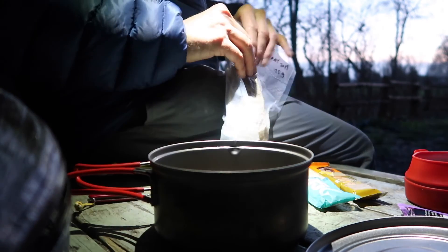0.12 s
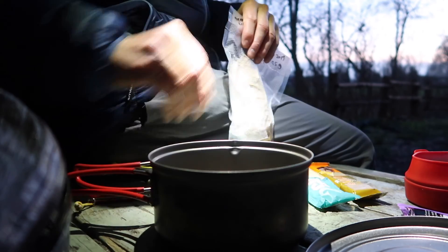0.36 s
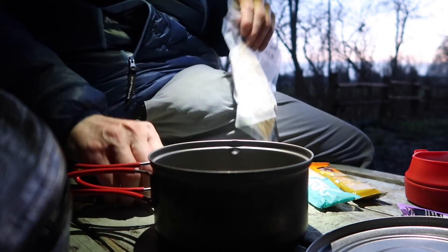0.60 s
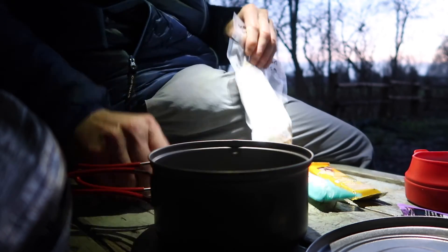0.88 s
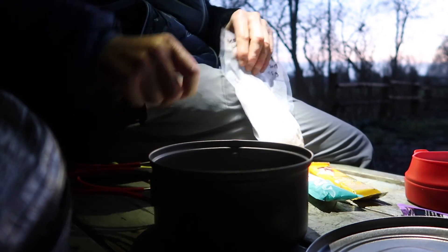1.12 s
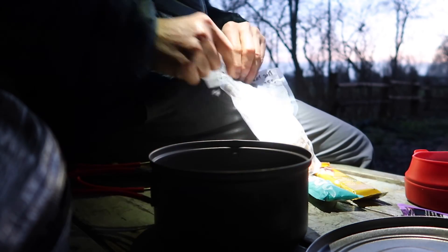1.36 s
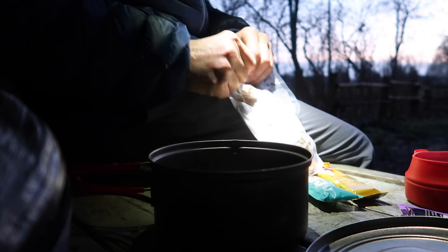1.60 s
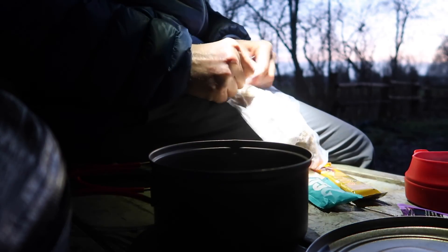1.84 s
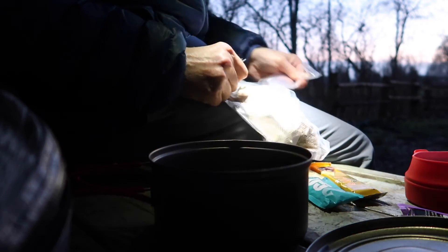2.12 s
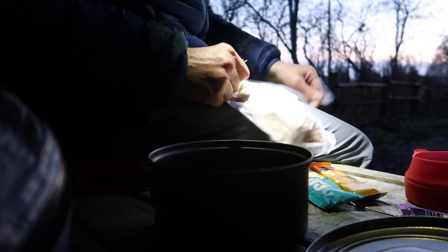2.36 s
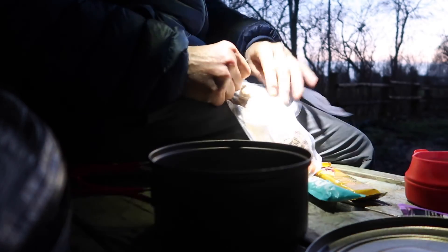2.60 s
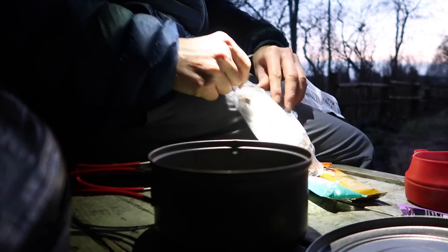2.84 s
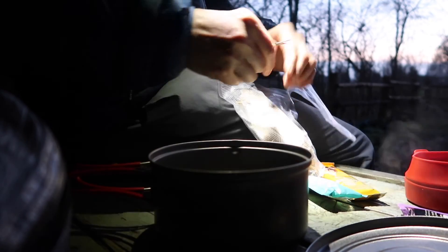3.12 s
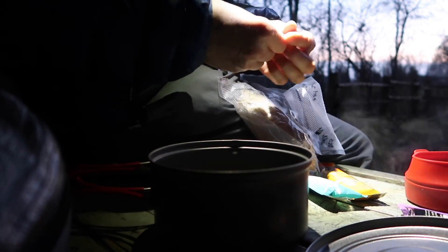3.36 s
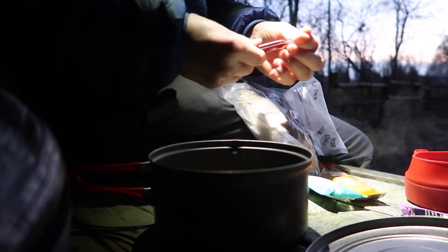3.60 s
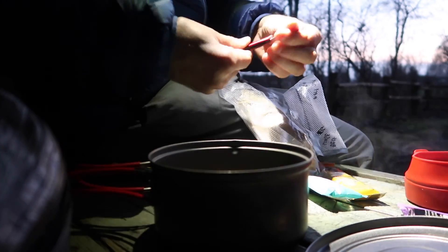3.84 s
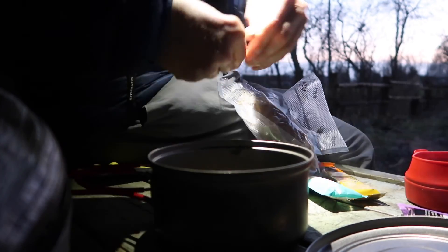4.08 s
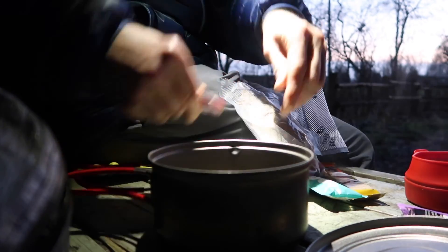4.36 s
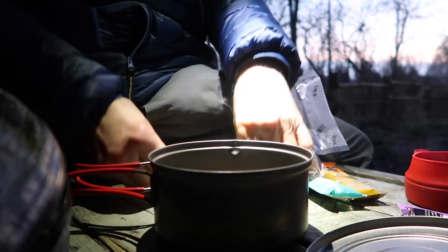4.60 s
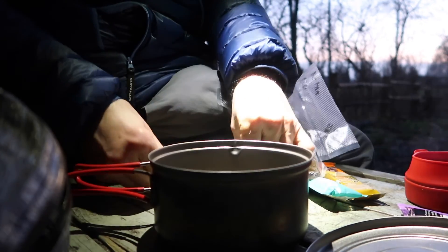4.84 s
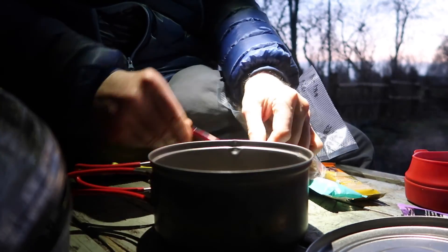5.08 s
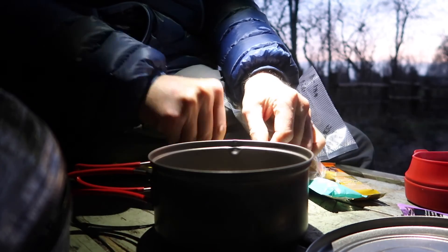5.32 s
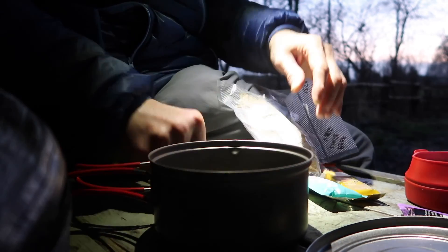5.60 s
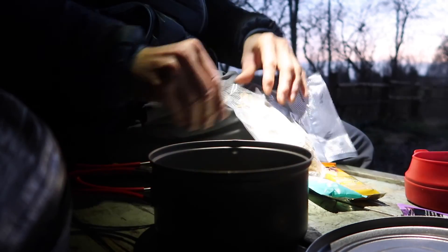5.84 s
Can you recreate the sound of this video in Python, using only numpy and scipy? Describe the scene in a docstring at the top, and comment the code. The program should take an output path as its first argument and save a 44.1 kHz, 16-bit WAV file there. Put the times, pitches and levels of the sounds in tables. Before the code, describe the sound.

Crackly plastic bag handling with bursts of hard pops, a quiet lull, one bright knife click and small table knocks outdoors.

```python
"""Sharp snaps over a dense crinkle: hands work a stiff plastic food bag at an outdoor table, close to a
two-port microphone. Folds are short swelling wavelets with a noise tick; crinkle, sliding film, slumping
contents and sleeves are clumped random grains. A folding knife clicks shut and is laid down, a pot is tapped,
things bump the table: damped modes. Snaps and the shutting knife return once from a hard surface nearby,
a short tail follows the near sounds, and a far road hums throughout as coloured noise."""
import sys
import numpy as np
from scipy import signal
from scipy.fft import rfft, irfft, next_fast_len
from scipy.io import wavfile
from scipy.ndimage import map_coordinates

SR = 44100
rng = np.random.default_rng(int(sys.argv[2]) if len(sys.argv) > 2 else 0)


def gain_from_decibels(decibels):
    """Convert decibel values to linear amplitude factors."""
    exponent = np.asarray(decibels, float) / 20
    return 10 ** exponent


def generate_wav(sig):
    """Save sig (samples, or channels by samples) to the path in sys.argv[1] as 16-bit PCM at SR."""
    pcm = np.round(np.clip(np.atleast_2d(sig).T, -1, 1) * 32767).astype(np.int16)
    wavfile.write(sys.argv[1], SR, pcm)


N = 262761
ECHO_S, ECHO_DB = .0068, -12  # the nearby hard surface: delay, level under the direct sound
FLAT = [(100, 0)]  # f/Hz, level/dB


def unit(x):
    """Scaled to rms 1."""
    return x / np.sqrt(np.mean(x ** 2) + 1e-20)


def along(points, hz):
    """Reads (f/Hz, value) points on a log frequency axis."""
    f, v = np.transpose(points)
    return np.interp(np.log(hz + 1), np.log(f + 1), v)


def curves(rows):
    """A (t/s, level/dB) curve, one value per sample; -120 dB outside it."""
    return np.interp(np.arange(N) / SR, *np.transpose(rows), -120, -120)


def wobble(rate):
    """A smooth random curve, rate knots a second."""
    knots = rng.standard_normal(int(N * rate / SR) + 4)
    return map_coordinates(knots, [np.arange(N) * rate / SR])


def strokes(rows):
    """Gain of overlapping gestures (t/s, peak level/dB, rise/s, fall/s), times per 20 dB; powers add."""
    t = np.arange(0, N + 32, 32) / SR
    s, db, rise_s, fall_s = np.transpose(rows)[:, :, None]
    rising = (s - t) / np.maximum(rise_s, .002)
    falling = (t - s) / np.maximum(fall_s, .002)
    away = np.where(t < s, rising, falling)
    gain = np.linalg.norm(gain_from_decibels(db - 20 * away), axis=0)
    return np.interp(np.arange(N) / SR, t, gain)


def swell(t, peak_s):
    """An envelope that builds to 1 at peak_s and dies away."""
    return (t / peak_s * np.exp(1 - t / peak_s)) ** 3


def ring(t, hz, t60, rise_s):
    """A damped vibration with a soft start."""
    return np.sin(2 * np.pi * hz * t) * gain_from_decibels(-60 * t / t60) * (1 - np.exp(-t / rise_s))


def filtered(x, response):
    """x times a complex response of frequency."""
    m = next_fast_len(N + 8192)
    return irfft(rfft(x, m) * response(np.fft.rfftfreq(m, 1 / SR)), m)[..., :N]


def spread(pair, spectrum, alike):
    """Two unrelated signals coloured, then mixed to left and right as alike as asked; rms 1."""
    def response(hz):
        turn = np.arccos(np.clip(along(alike, hz), -1, 1)) / 2
        return gain_from_decibels(along(spectrum, hz)) * [np.cos(turn), np.sin(turn)]
    mid, side = filtered(pair, response)
    return unit(np.array([mid + side, mid - side]))


# Phase by which the left port leads, at a share of 1: f/Hz, lead/rad
PORT_LEAD = [(100, -0.25), (500, -.1), (2000, 0.18), (3500, -0.44), (5000, -1.5), (9000, -3), (12000, -1.8),
             (16000, -4)]


def ports(x, share):
    """Sound from one side reaches the two ports out of step; a negative share is the other side."""
    sides = np.array([[1], [-1]])
    return filtered(x, lambda hz: np.exp(.5j * share * along(PORT_LEAD, hz) * sides))


def crackle(per_s, spread_db, clump_db, life_s):
    """Two trains of tiny random bursts that come in clumps."""
    sizes = gain_from_decibels(spread_db * np.minimum(rng.exponential(size=(2, N)), 3.5) + clump_db * wobble(60))
    sparks = sizes * (rng.random((2, N)) < per_s / SR)
    glow = signal.lfilter([1], [1, -np.exp(-1 / (life_s * SR))], sparks)
    return unit(glow * rng.standard_normal((2, N)))


def grains(per_s, pitch_hz, octaves, cycles, spread_db):
    """Small folds letting go at random: each a short wavelet at its own pitch; two unrelated sets."""
    draw = rng.random((int(per_s * N / SR), 4))
    pitches = pitch_hz * 2 ** (octaves * rng.standard_normal(len(draw)))
    hz = np.clip(pitches, 700, 9000)[:, None]
    k = np.arange(1, 160)
    size = gain_from_decibels(-spread_db * np.log(draw[:, 1:2] + 0.056))
    wave = size * swell(k / SR, cycles / hz) * np.sin(2 * np.pi * (hz * k / SR + draw[:, 2:3]))
    where = (2 * N * draw[:, :1]).astype(int) + k
    both = np.bincount(where.ravel(), wave.ravel(), 2 * N + len(k) + 1)[:2 * N]
    return unit(both.reshape(2, N))


# Folds that buckle, and the knife's contacts as it is laid down:
# t/s, nominal level/dB, ring f/Hz, edge tick level/dB over it (before EDGE), flutter level/dB over it
SNAPS = [(.009, -10, 3070, 1, -31), (.014, -10.5, 2350, -10, -24.5), (0.028, -14.5, 2540, -7, -25),
         (.064, -26, 2800, -6, -20), (0.112, -23, 2400, -12, -21), (.113, -24, 3520, -8, -19),
         (.121, -32, 2800, -11.5, -16), (.258, -14, 2820, 3, -33), (0.264, -16, 2720, 0, -22),
         (.285, -17, 2840, 16, -20), (.29, -20, 2200, 6, -9), (0.3, -24, 4540, 0, -20),
         (.456, -14, 2410, -6.5, -13.5), (.457, -13.5, 3780, 2, -27.5), (0.502, -29, 2940, -5, -31),
         (.531, -24, 1430, -22.5, -34), (.532, -27, 2600, -18, -33), (.972, -35, 2880, -11, -25),
         (1.004, -23, 2600, -10, -23), (1.013, -16, 2820, -5, -29), (1.029, -19.5, 1500, -15.5, -19),
         (1.051, -19.5, 2400, -8, -11), (1.057, -28.5, 4240, 19, -10), (1.1, -37.5, 4500, -24, -25),
         (1.1772, -19.5, 2100, -10, -22), (1.1773, -28, 3870, -8, -24), (1.1994, -19, 1630, -13, -26),
         (1.1998, -26, 3080, -10, -26), (1.2037, -23, 1900, -10, -25), (1.2036, -30, 4200, -8, -22),
         (1.221, -34, 2000, -10, -16.5), (1.2612, -22, 2830, -10, -18), (1.2617, -25.5, 1500, -10, -20),
         (1.262, -23, 4300, -10, -29), (1.286, -30, 2500, -10, -12), (1.3015, -27, 1900, 7, -9),
         (1.3017, -26, 4600, -5, -16), (1.3278, -29, 3200, -15, -22), (1.334, -32, 2700, -15, -18),
         (1.345, -9.5, 2170, -8, -15), (1.352, -12.5, 5060, 3, -19), (1.372, -20.5, 2400, -15, -11),
         (1.437, 0, 2420, -26.5, -23), (1.4369, -12, 1580, -23.5, -16), (1.4381, -8, 2720, -17, -20),
         (1.443, -13.5, 2500, -5, -15), (1.623, -23, 2800, -2, -21), (1.631, -15, 2650, -7, -27),
         (1.663, -14.5, 2710, 2, -31), (1.68, -26, 3600, -5, -18), (1.684, -22.5, 1360, -2, -9),
         (1.707, -27.5, 3980, -5, -18), (1.733, -28, 3000, -5, -18), (1.752, -23, 1370, -9, -27),
         (1.794, -25.5, 2960, -5, -15), (1.802, -19.5, 1490, 12, -12), (1.8016, -24, 3480, -5, -18),
         (1.8232, -20, 3900, 0, -21), (1.8238, -15.5, 2430, 4, -18), (1.845, -16, 1450, -4, -20),
         (1.8446, -22, 2860, -5, -25), (1.872, -10.5, 3200, 10, -28), (1.9243, -24.5, 1460, -3, -10),
         (1.9237, -23.5, 3200, -7.5, -19), (1.965, -24, 3300, -17, -25.5),
         (1.9695, -26.5, 3100, -17.5, -41), (1.986, -27, 2400, -12, -14), (1.9864, -24, 4170, -8, -19),
         (2.003, -30, 1380, 15, -2), (2.0315, -14, 3700, 12, -10), (2.0334, -6, 3960, 10, -18),
         (2.0412, -13, 4300, 13, -8), (2.042, -11.5, 1210, 10, -11), (2.046, -16, 3700, 0, -9),
         (2.0515, -18, 3300, 0, -12), (2.0575, -13, 3600, 12, -9), (2.059, -13, 3300, 5, -12),
         (2.0715, -20, 3400, -5, -18), (2.078, -19.5, 2330, 14, -7), (2.0785, -21, 3800, 0, -15),
         (2.1035, -22, 3500, -8, -18), (2.107, -20, 3200, -8, -20), (2.114, -13.5, 3300, -4.5, -16),
         (2.1207, -22, 3600, -8.5, -16), (2.1298, -13.5, 3400, -8, -23), (2.189, -27.5, 2570, 17, -8),
         (2.204, -12, 3020, -12, -19), (2.208, -10.5, 3870, -9, -23), (2.212, -15, 3500, -5, -15),
         (2.2154, -17, 4000, -5, -20), (2.2395, -16, 2840, -4, -16), (2.2476, -16, 2500, -4, -16),
         (2.2575, -10.5, 2400, 1, -9.5), (2.2592, -15, 1310, -5, -11), (2.293, -26, 3300, -17.5, -17),
         (2.303, -23, 3580, -10, -15), (2.3098, -21, 2200, -6, -12), (2.318, -22, 2600, 2, -10),
         (2.322, -21, 1320, -8, -9), (2.342, -13, 1780, 16, -18), (2.3411, -19, 3300, 5, -18),
         (2.347, -15.5, 2200, 13, -6), (2.354, -21, 1990, 0, -13), (2.413, -26, 2400, 25, -7),
         (2.421, -22.5, 3740, 22, -8), (2.515, -30.5, 3320, 0.5, -16), (2.55, -20.5, 3220, -5, -13),
         (2.571, -14, 2520, 21, -24), (2.5715, -15, 4300, 10, -19), (2.5708, -20, 1200, 0, -24),
         (2.578, -21, 4400, -1, -10), (2.5977, -9, 1670, 4, -7), (2.606, -12, 2200, -1, -12),
         (2.6126, -8, 1720, 2, -7), (2.621, -13, 2070, -1, -8), (2.628, -22, 1590, 3, -6),
         (2.638, -10, 2600, -7, -7), (2.645, -14.5, 2570, -1, -7), (2.651, -12, 1570, 7, -8),
         (2.657, -18, 2200, 13, -6), (2.742, -26, 3000, 0, -18), (2.762, -23, 2300, 0, -10),
         (2.767, -12.5, 2450, 14, -19), (2.774, -15.5, 1400, -4, -10), (2.888, -18.5, 2120, 17, -7),
         (2.939, -21, 2630, 16, -27), (3.093, -18.5, 2030, 29, -8), (3.0926, -21.5, 4100, 12, -12.5),
         (3.0935, -15, 6050, 6.5, -9), (4.697, -21, 2460, -7, -14), (4.698, -10.5, 5700, 8, -16),
         (4.705, -10.5, 5570, 1, -24), (4.773, -12, 1720, 18.5, -13.5), (4.78, -13.5, 4200, 11, -20),
         (4.792, -21.5, 1500, -2, -4.5), (4.803, -11, 6440, 10, -11), (4.809, -10, 6200, 15, -14.5),
         (4.876, -22, 3300, -10, -24), (5.446, -19, 2340, 2, -17)]
# A sharp edge through the port cavity: f/Hz, level/dB
EDGE = [(2500, -18), (4500, -27), (6000, -29), (9000, -17), (11300, -4.5), (13000, -12), (14500, -12),
        (16500, -11)]
# Where the hands are: t/s, how far off to one side (0-1)
HANDS = [(0, .6), (1, .7), (2, .9), (3, .8), (4.1, .05), (4.4, .05), (4.7, .8), (5.9, .7)]


def snaps():
    """A fold builds up and lets go in about two cycles at a pitch set by its size, then flutters;
    its sharp edge spits a bright tick."""
    t = np.arange(SR // 25) / SR
    folds = np.zeros((3, N + SR))  # ahead, aside, echo
    edges = np.zeros((4, N + SR))  # the same, then stray
    for s, db, hz, edge_db, flutter_db in SNAPS:
        turn, fizz = rng.random(), rng.standard_normal((3, len(t)))
        fold = swell(t, 0.0002 + 1.01 / hz) * np.sin(2 * np.pi * (hz * t + turn))
        wide = signal.butter(1, [hz * .55, min(hz * 1.9, SR / 2.2)], "bandpass", fs=SR)
        flutter = unit(signal.lfilter(*wide, fizz[0])) * swell(t ** .5, 0.033)
        body = gain_from_decibels(db) * (fold + gain_from_decibels(flutter_db) * flutter)
        tick = swell(t, 0.00043) * fizz[1]
        tick *= gain_from_decibels(db + edge_db) / np.linalg.norm(tick)
        aside = np.clip(np.interp(s, *np.transpose(HANDS)), 0, 1)
        paths = [(0, 1 - aside), (0, aside), (ECHO_S, gain_from_decibels(ECHO_DB))]
        for path, (late_s, gain) in enumerate(paths):
            start = round((s + late_s) * SR)
            folds[path, start:][:len(t)] += gain * body
            edges[path, start:][:len(t)] += gain * tick
        stray = swell(t, 0.00091) * fizz[2]  # what the fingers scatter differs between the ports
        stray *= aside * gain_from_decibels(db + edge_db - 11) / np.linalg.norm(stray)
        edges[3, round(s * SR):][:len(t)] += stray
    *ticks, stray = filtered(edges[:, :N], lambda hz: gain_from_decibels(along(EDGE, hz)))
    ahead, aside, echo = folds[:, :N] + ticks
    smear = rng.standard_normal(24) * gain_from_decibels(-np.arange(24) / 6.5)  # the reflector is uneven
    back = signal.fftconvolve(echo, smear / np.linalg.norm(smear))[:N]
    back = filtered(back, lambda hz: (1j * hz / (2600 + 1j * hz)) ** 2)  # and small: mostly treble returns
    return ahead + stray * [[1], [-1]] + ports(aside, 1.0) + ports(back, -0.22)


# Sudden jolts that set the film crinkling:
# t/s, peak level/dB, fall/s by 20 dB (at least 0.002), tight folds' level/dB above the rest
JOLTS = [(0, -29, 0.0541, -6), (.256, -32, 0.08, -6.5), (.46, -24, -0.02, -6), (1.178, -33.5, 0.05, -17),
         (1.2, -41, .1, -14), (1.261, -39.5, 0.1, -12), (1.303, -40.5, 0.2, -8), (1.348, -24, .01, 0),
         (1.44, -33, 0.01, -20), (1.625, -43, 1.5, -12), (1.8, -35, 0.03, -15.5), (1.846, -28, 0, -19),
         (2.032, -30.5, 0.09, 4), (2.204, -32, .05, -2), (2.341, -28, 0.0243, -14), (2.573, -42, 0.25, 1),
         (2.762, -26, 0.0558, -11), (2.886, -39.5, 0.2, -9), (3.094, -43.5, 0.05, 4), (4.776, -27, .01, -3)]
# Slower kneading: t/s of the peak, peak level/dB, rise/s and fall/s by 20 dB (at least 0.002)
KNEADS = [(1.5, -46.5, 0.3, 1.5), (1.88, -34, 0.2, -0.2), (2.0, -49, 0.4, .5), (2.116, -32.5, .17, 0.03),
          (2.249, -32, .04, 0.1), (2.32, -36.5, 0.07, 0.27), (2.437, -34, .05, 0.05),
          (2.56, -40, .01, 0.45), (2.613, -23, 0.0138, 0.15), (2.8, -41, 0.1, 0.28)]
# Spectrum of the bag: f/Hz, relative level/dB per Hz
FILM = [(500, -16), (1300, 0), (2000, -0.5), (3200, -3.5), (4500, -20.5), (8000, -40.5)]
# Spectrum of the tightest folds: f/Hz, relative level/dB per Hz
CRISP = [(2500, -2.5), (4200, -1), (6500, -2), (9000, -10.5), (12000, -3.5), (16000, -41)]
# Near sounds at the two ports: f/Hz, left-right likeness
NEAR_ALIKE = [(300, 1), (2000, 1), (3500, 0.95), (6000, 0.13), (12000, 0.85)]


def crinkle():
    """Small folds pop over a finer crackle, more so the harder the grip, the tightest ones brighter."""
    jolt_rise_s = 0.004  # by 20 dB
    knead_tight_db = -8.5  # tight folds above the rest
    jolts = [(s, db, jolt_rise_s, fall_s) for s, db, fall_s, _ in JOLTS]
    tight_jolts = [(s, db + tight_db, jolt_rise_s, fall_s) for s, db, fall_s, tight_db in JOLTS]
    tight_kneads = [(s, db + knead_tight_db, rise_s, fall_s) for s, db, rise_s, fall_s in KNEADS]
    grip = strokes(jolts + KNEADS)
    pinch = strokes(tight_jolts + tight_kneads)
    popping = np.clip((20 * np.log10(grip + 1e-9) + 54) / 26, .2, .65)
    smooth = np.sqrt(1 - popping ** 2)
    fine = crackle(2200, 3, 2.8, .0004)
    pops = spread(grains(420, 2710, 0.42, 1.42, 2.6), FLAT, NEAR_ALIKE)
    tight_pops = spread(grains(450, 3770, 0.23, 1.14, 1.4), FLAT, NEAR_ALIKE)
    body = popping * pops + smooth * spread(fine, FILM, NEAR_ALIKE)
    tight = popping * tight_pops + smooth * spread(fine, CRISP, NEAR_ALIKE)
    return grip * body + pinch * tight


# The film slides under the fingers: t/s of the peak, peak level/dB, rise/s and fall/s by 20 dB (at least 0.002)
SLIDES = [(.165, -44.5, 0.2, -0.03), (.22, -40, .015, 0.13), (.418, -39, 0.14, 0.04),
          (.788, -43.5, 0.07, .05), (.97, -34.5, 0.09, 0.15), (1.015, -31.5, 0.08, 0.07),
          (1.055, -32, 0.04, 0.04), (1.462, -35, 0.04, 0.04), (2.63, -30, 0.04, 0.0855),
          (3.36, -40, -0.11, -0.19), (4.715, -43, 0.16, 0.1), (4.82, -40.5, 0.1, 0.08),
          (4.68, -52.5, 0.2, 0.7), (5.114, -43.5, .05, 0.09), (5.36, -50, 0.44, .5), (5.59, -48, 0, 0.4),
          (5.655, -46, -0.04, 0.06), (5.886, -42.5, 0.12, -0.03)]
# Film drawn taut: f/Hz, relative level/dB per Hz
SLICK = [(500, -15), (1400, -4.5), (2000, -4.5), (2800, -1), (3600, -8.5), (4600, -19), (8000, -34)]


def sliding():
    """Taut film sliding smoothly: a dense grain, with the tight folds' colour 9 dB under it."""
    sheen = crackle(3500, 2.2, 1.5, .0005)
    slick = spread(sheen, SLICK, NEAR_ALIKE) + gain_from_decibels(-9) * spread(sheen, CRISP, NEAR_ALIKE)
    return strokes(SLIDES) * slick


# The loose contents slump: t/s of the peak, peak level/dB, rise/s and fall/s by 20 dB (at least 0.002)
SLUMPS = [(0, -19.5, .01, 0.02), (.04, -40.5, 5, .5), (.292, -26, .005, 0), (.388, -42, 0.1, 0.1),
          (.465, -35, 0.03, 0.07), (.992, -45, 0.5, -0.1), (1.038, -32.5, -0.13, 0.15),
          (1.72, -40.5, 0.7, .5), (1.842, -41.5, 0.3, 0.2), (2.002, -40, 0.2, 0.1),
          (2.044, -26.5, .01, 0.02), (2.07, -35.5, 0.13, 0.15), (2.212, -33, 0.06, .5),
          (2.608, -32.5, .005, 0.17), (2.772, -31, 0.04, 0.11), (2.892, -41, 0.1, 0.1),
          (3.07, -42, 0.5, -0.07), (3.094, -40.5, 0.17, 0.18), (4.636, -41.5, -0.06, 0.46),
          (4.872, -32.5, -0.01, 0.16)]
# Spectrum of the contents: f/Hz, relative level/dB per Hz
CONTENTS = [(120, -12), (250, 7.5), (500, 10.5), (1100, 7), (2000, -26)]


def slumping():
    """The loose contents shift with a duller, sparser grain."""
    return strokes(SLUMPS) * spread(crackle(900, 3, 2, .0025), CONTENTS, NEAR_ALIKE)


def bag():
    """Crinkling, sliding and slumping reach the ports from the same side."""
    return ports(crinkle() + sliding() + slumping(), 0.89)


# Modes of handle and steel: f/Hz, level/dB under the click's gain, t60/s
KNIFE = [(2400, 3, 0.0026), (3070, 1.5, 0.0087), (4860, -8, .005), (10800, -8.5, 0.0076),
         (11600, -5.5, 0.0085), (12900, 0, 0.0065), (14900, 1, .007)]
# Spectrum of the click's diffuse tail: f/Hz, relative level/dB per Hz
CLICK_TAIL = [(800, -21), (2000, -3), (5000, -3.5), (8000, -11), (11000, -2.5), (13500, -24), (16000, -30)]


def knife():
    """The spring slams the blade home: handle and steel ring for a few milliseconds, almost straight ahead,
    then the echo and a long, airy diffuse tail."""
    shut_s, shut_db, rattle_db = 4.2744, -3, -17  # rattle is relative to the click's gain
    tail_db, tail_t60_s = -32, 0.2
    t = np.arange(SR // 40) / SR
    click = gain_from_decibels(rattle_db - 60 * t / 0.031) * rng.standard_normal(len(t))
    for k, (hz, db, t60) in enumerate(KNIFE):
        click += (-1) ** k * gain_from_decibels(db) * ring(t, hz, t60, .00008)
    click *= gain_from_decibels(shut_db)
    smear = rng.standard_normal(80) * gain_from_decibels(-np.arange(80) / 4)
    answer = np.convolve(click, smear / np.linalg.norm(smear))[:len(t)]
    direct, echo = np.zeros((2, N))
    direct[round(shut_s * SR):][:len(t)] = click
    echo[round((shut_s + ECHO_S) * SR):][:len(t)] = gain_from_decibels(ECHO_DB) * answer
    echo = filtered(echo, lambda hz: 1j * hz / (6000 + 1j * hz))
    since = np.arange(N) / SR - shut_s - ECHO_S
    fade = (since > 0) * gain_from_decibels(tail_db - 60 * np.abs(since) / tail_t60_s)
    buzz = fade * spread(rng.standard_normal((2, N)), CLICK_TAIL, NEAR_ALIKE)
    return buzz + ports(direct, 0.59) + ports(echo, -0.55)


def knocks(rows, modes):
    """Each contact rings the object's modes anew, their balance a little different every time."""
    out, t = np.zeros(N + SR), np.arange(SR // 5) / SR
    for s, db in rows:
        for hz, mode_db, t60 in modes:
            gain = gain_from_decibels(db - 7 + mode_db + 1.5 * rng.standard_normal())
            out[round(s * SR):][:len(t)] += gain * ring(t, hz, max(t60, .005), .0001)
    return out[:N]


# The knife is laid down and rocks on the boards: t/s, level/dB (before knocks() trims 7 dB)
LAID = [(4.8672, -13), (4.869, -14), (4.876, -24), (4.881, -17), (4.892, -19)]
# Modes of the handle: f/Hz, relative level/dB, t60/s
HANDLE = [(428, -3.5, 0.038), (620, -9.5, .06), (880, -13, 0.053), (1152, -9, 0.052), (1400, -10, .06),
          (1540, 0, 0.021), (1701, -6.5, 0.062), (2040, -4, 0.022)]


def knife_laid():
    """The handle's modes ring at each contact with the boards."""
    return knocks(LAID, HANDLE)


# A finger taps the pot: t/s, level/dB (before knocks() trims 7 dB)
TAPS = [(5.4465, -24), (5.453, -36)]
# Modes of the pot: f/Hz, relative level/dB, t60/s
POT = [(2300, 5, 0.035), (2400, -5, .05), (2982, -14, .1), (3700, -2.5, 0.042), (4064, -11, .06)]


def pot_taps():
    """The pot's modes ring at each tap."""
    return knocks(TAPS, POT)


# Soft bumps on the table top: t/s, level/dB (before a 4 dB trim), nominal ring f/Hz,
# nominal t60/s (at least 0.01), upper modes' and slap's level/dB: hard contact high, soft low
BUMPS = [(0.009, -24, 461, 0.049, 4), (0.256, -23.5, 312, 0.076, -10.5), (0.286, -27.5, 655, 0.14, -1),
         (0.457, -23.5, 368, 0.069, -11), (0.479, -23, 365, 0.096, -8.5), (0.7297, -19.5, 238, 0.028, -23),
         (.741, -25, 165, 0.062, -21.5), (.764, -28.5, 150, 0.064, -21), (.782, -30, 221, 0.03, -15),
         (1.034, -19.5, 692, 0.069, -20), (1.035, -24.5, 340, 0.072, -10), (1.043, -20, 900, 0.048, -23),
         (1.049, -24, 673, 0.11, -7), (2.696, -19, 424, 0.043, -5.5), (3.093, -17.5, 560, 0.035, 2),
         (4.629, -33, 240, 0.054, 1.5), (5.447, -22.5, 443, 0.035, -6), (5.461, -29.5, 342, 0.084, -15)]


def bumps():
    """A soft blow on boards: a few low, quickly damped modes around one pitch, and the contact's rough slap."""
    out, t = np.zeros(N + SR), np.arange(SR // 3) / SR
    # pitch ratio, level/dB, share of t60
    low = [(1, -0.5, 1), (1.45, -1, 0.87), (2.3, -6.5, 1)]
    upper = [(3.35, 4.5, 0.34), (3.9, 6, 0.31), (4.7, 0, 0.28), (5.6, -4, 0.27)]
    for s, db, hz, t60, hard_db in BUMPS:
        t60 = max(t60, .01)
        knock = np.zeros(len(t))
        for ratio, mode_db, share in low + [(r, d + hard_db, k) for r, d, k in upper]:
            mode_hz = hz * ratio * gain_from_decibels(0.45 * rng.standard_normal())  # slightly mistuned at random
            knock += gain_from_decibels(mode_db) * ring(t, mode_hz, t60 * share, 0.00034)
        band = signal.butter(2, [hz * .7, hz * 5.5], "bandpass", fs=SR)
        rough = unit(signal.lfilter(*band, rng.standard_normal(len(t))))
        slap = rough * gain_from_decibels(hard_db - 6 - 60 * t / (1.6 * t60))
        out[round(s * SR):][:len(t)] += gain_from_decibels(db - 4.0) * (knock + slap)
    return out[:N]


# A hand lands and leans on the table: t/s of the peak, rumble level/dB, rise/s and fall/s by 20 dB
NUDGE = [(.736, -34.5, .008, .14), (.768, -39, .02, .1)]
# Spectrum of the boards: f/Hz, relative level/dB per Hz
BOARDS = [(30, -12), (65, -2), (150, 3), (220, 0.5), (300, -1), (420, -10), (900, -46.5)]
# Road, sleeves and boards at the two ports: f/Hz, left-right likeness
ROAD_ALIKE = [(60, .9995), (130, 0.99), (200, 0.99), (300, 0.72), (700, 0.95), (1500, 0.97), (3000, 0.61),
              (6000, 0.016), (12000, 0)]


def nudge():
    """The table's boards shudder under a hand."""
    return strokes(NUDGE) * spread(crackle(400, .5, .5, 0.014), BOARDS, ROAD_ALIKE)


# Arm movements: t/s of the peak, swish level/dB, rise/s and fall/s by 20 dB (at least 0.002)
SWISHES = [(0, -36.5, .1, 0.07), (.218, -38, .012, 0.16), (.27, -53, 0.7, .7), (.6, -62, -1.5, 6),
           (.93, -47, 0.26, 0.2), (1.676, -49, 0, 0.1), (2.605, -36, 0.17, 0.33), (2.988, -49, .05, 0.8),
           (4.05, -57.5, 0.6, 0.5), (4.55, -53.5, 0.9, .6), (5.12, -48, -5, -0.8), (5.702, -49.5, 1, 0.5)]
# Spectrum of the fabric: f/Hz, relative level/dB per Hz
NYLON = [(1200, -7), (2500, 17.5), (4000, 12.5), (6000, 9), (9000, 3.5), (12000, 8.5), (16000, 7.5)]


def sleeves():
    """Slick fabric sliding on itself: a very fine, dense grain that never rests quite still."""
    rest_db = -81
    return np.hypot(strokes(SWISHES), gain_from_decibels(rest_db)) * spread(crackle(4500, 1.8, 0.65, 0.00099), NYLON, ROAD_ALIKE)


# Scatter from trees and fence: f/Hz, t60/s
YARD = [(300, 0.22), (2500, 0.2), (8000, 0.19), (14000, 0.014)]


def yard(x):
    """A short diffuse tail; each frequency dies at its own speed."""
    noise = spread(rng.standard_normal((2, N)), FLAT, NEAR_ALIKE)[:, :SR // 3]
    hz, t, z = signal.stft(noise, SR, nperseg=256)
    tail = signal.istft(z * gain_from_decibels(-60 * t / along(YARD, hz)[:, None]), SR, nperseg=256)[1]
    late = np.pad(x, ((0, 0), (400, 0)))  # the tail starts 400 samples late
    return signal.fftconvolve(late, tail / np.linalg.norm(tail[0]), axes=1)[:, :N]


# Road loudness before its drift: t/s, level/dB
TRAFFIC = [(0, -39.5), (1.6, -40), (2.4, -41.5), (3, -41), (4.2, -40), (4.7, -40), (5.96, -38.5)]
# Spectrum of the road: f/Hz, relative level/dB per Hz
ROAD = [(20, -14), (40, -9), (70, -0.5), (170, -0.5), (260, -8.5), (600, -10), (950, -3), (1400, -8),
        (2000, -18.5), (3500, -24.5), (7000, -34.5), (16000, -46.5)]


def road():
    """Far tyres roar near 1 kHz over an engine rumble; the level drifts slightly."""
    drift_db = 0.4 * wobble(3) + .8 * wobble(5.4)
    return gain_from_decibels(curves(TRAFFIC) + drift_db) * spread(rng.standard_normal((2, N)), ROAD, ROAD_ALIKE)


def scene():
    """Bag, bumps and knocks, a little to the right, with their tail; then knife click, sleeves and road."""
    near = snaps() + bag() + knife_laid() + pot_taps() + bumps() + nudge()
    near = near * gain_from_decibels([[-.4], [.4]])
    tail = gain_from_decibels(-14.5) * yard(near)
    return near + tail + knife() + sleeves() + road()


def low_pass(x):
    """Removes everything above the highest recorded frequency."""
    return signal.sosfilt(signal.butter(12, 16630, fs=SR, output="sos"), x)


# Microphone response: f/Hz, level/dB
MICROPHONE = [(20, -0.5), (8000, -3), (12500, -5), (14000, -9.5), (15500, -19.5), (16600, -24)]


def record(dry):
    """The microphone rolls off the top."""
    mix = filtered(dry, lambda hz: gain_from_decibels(along(MICROPHONE, hz)))
    return low_pass(mix)


dry = scene()
out = record(dry)
generate_wav(out)
```